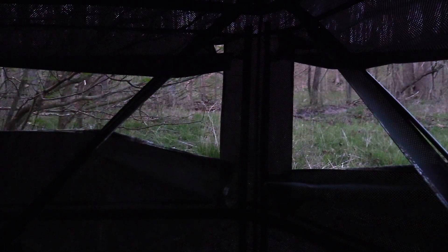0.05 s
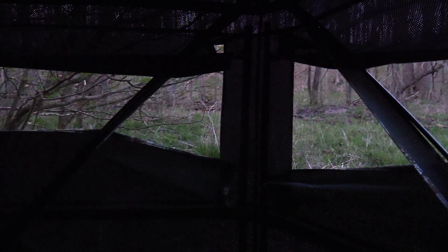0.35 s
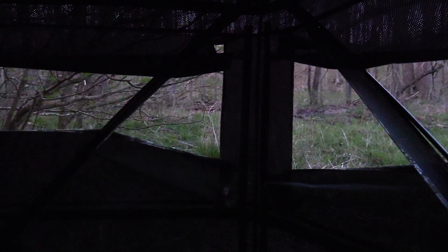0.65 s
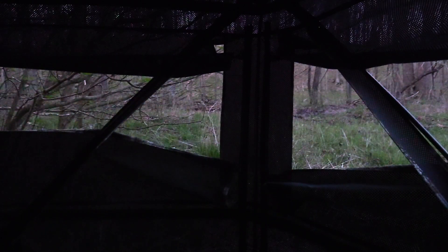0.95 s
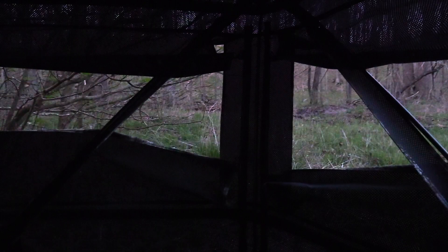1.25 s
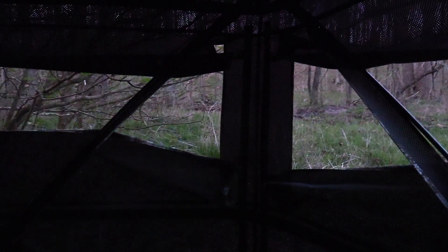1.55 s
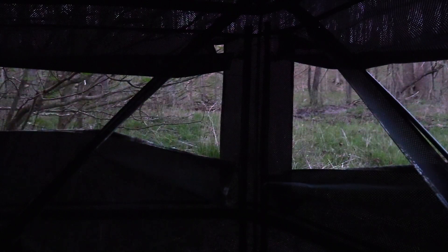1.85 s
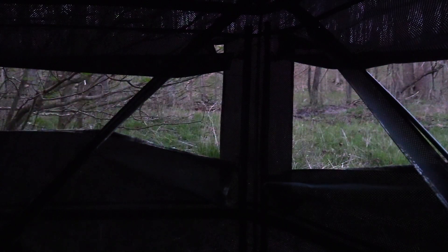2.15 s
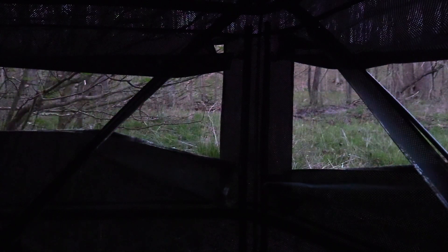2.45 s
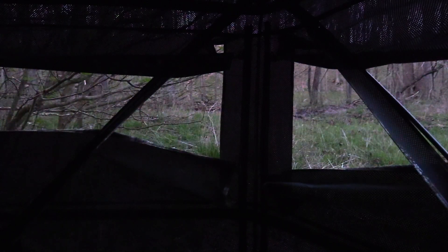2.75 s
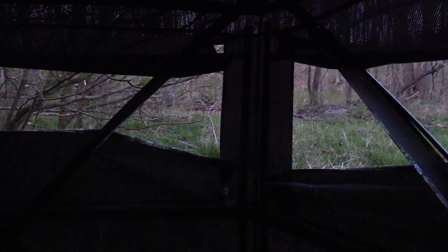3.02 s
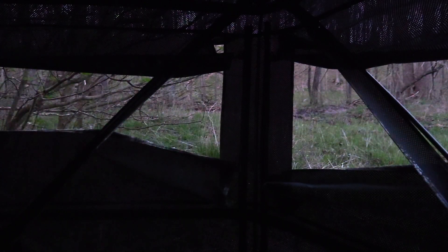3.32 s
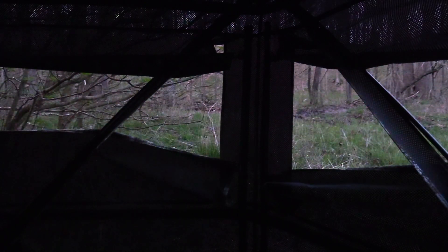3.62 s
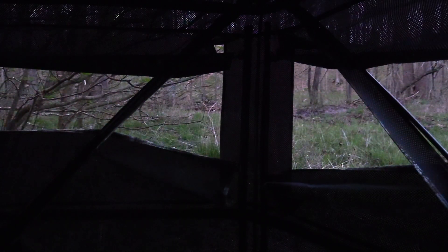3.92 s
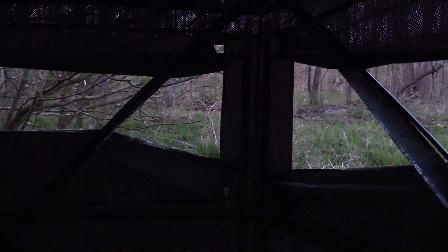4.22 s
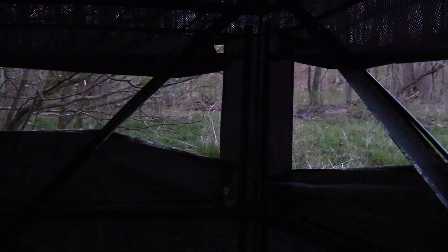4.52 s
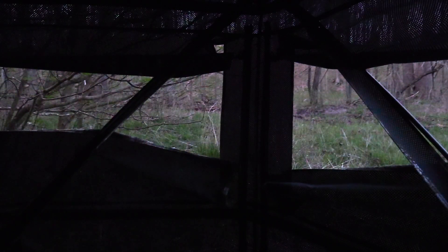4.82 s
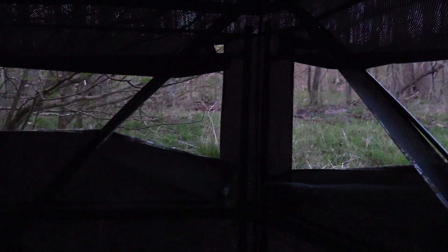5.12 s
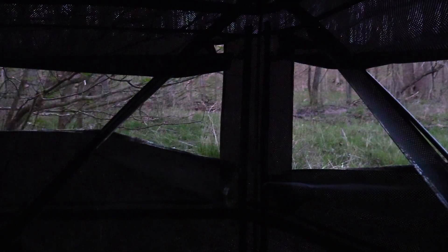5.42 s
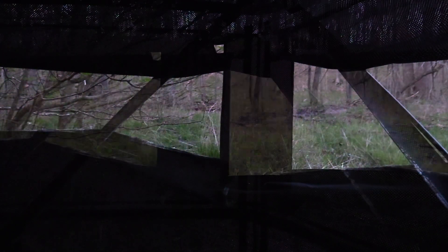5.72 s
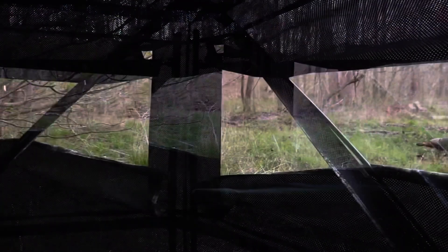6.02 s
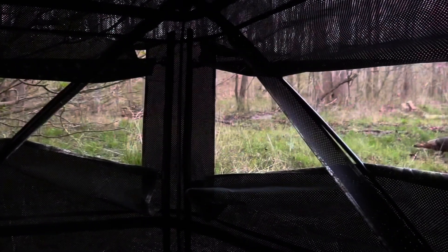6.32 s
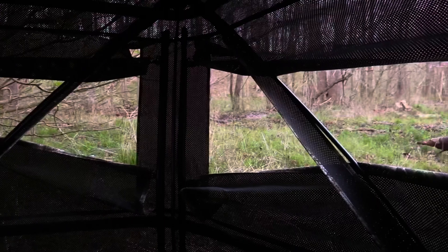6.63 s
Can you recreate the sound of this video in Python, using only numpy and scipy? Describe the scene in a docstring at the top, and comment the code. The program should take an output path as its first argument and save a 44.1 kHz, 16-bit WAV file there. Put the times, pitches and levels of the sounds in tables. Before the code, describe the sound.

Heard from a fabric blind at the edge of a wood, songbirds whistle clear and falling notes over a steady low rumble. A nearby turkey clucks once and yelps five times, sharp and slightly raspy, and a far tom gobbles back. The birdsong carries on alone, thinning out toward the end, when low, muffled thumps knock the microphone.

```python
"""Wild turkey at the blind

From a fabric blind at the edge of a wood: close to the microphone a turkey's vibrating membrane gives
one sharp cluck and five yelps, coloured by throat and beak. A far tom gobbles back, songbirds whistle
among the trees and low air rumbles throughout. Near the end the background fades down and cuts back in,
with the far chorus gone, then soft bumps shake the microphone."""
import sys
import numpy as np
from scipy import signal
from scipy.fft import rfft, irfft, next_fast_len
from scipy.io import wavfile

SR = 44100
rng = np.random.default_rng(int(sys.argv[2]) if len(sys.argv) > 2 else 0)


def bounce(signal):
    """Save signal as a 16-bit WAV file at the path given by the first command-line argument."""
    frames = np.transpose(np.atleast_2d(signal))
    limited = np.clip(frames, -1, 1)
    pcm = np.round(limited * 32767).astype(np.int16)
    wavfile.write(sys.argv[1], SR, pcm)


N = 302967
T = np.arange(N) / SR
SIDE = np.array([[1], [-1]])  # opposite polarity left and right


def undb(db):
    return 10 ** (np.asarray(db) / 20)


def unit(x):
    """Scale to rms 1."""
    return x / np.sqrt(np.mean(x ** 2))


def ramp(t, length):
    """Rise from 0 to 1 over a length of time."""
    return np.clip(t / length, 0, 1)


def curve(rows):
    """Join (t/s, value) points by straight lines."""
    return np.interp(T, *np.transpose(rows))


def span(s, length, fade=0.0073):
    """Sample indices of a note, the time since its start, and a gate with soft ends."""
    i = np.arange(int(s * SR), int((s + length) * SR))
    return i, T[i] - T[i[0]], ramp(np.minimum(i - i[0], i[-1] - i), fade * SR)


def wander(hz):
    """Smooth random motion of rms 1, mostly slower than hz."""
    return unit(signal.sosfilt(signal.butter(2, hz, fs=SR, output="sos"), rng.standard_normal(N)))


def turns(hz):
    """Running phase of a moving frequency."""
    return 2 * np.pi * np.cumsum(hz) / SR


def response(points, hz):
    """Gain of a (f/Hz, level/dB) colour at the given frequencies."""
    f, db = np.transpose(points)
    return undb(np.interp(np.log(hz + 1e-3), np.log(f), db))


def colour(x, points):
    """Filter by a (f/Hz, level/dB) colour."""
    size = next_fast_len(N)
    return irfft(rfft(x, size) * response(points, np.fft.rfftfreq(size, 1 / SR)), size)[:N]


def noise(points):
    """Coloured noise of rms 1."""
    return unit(colour(rng.standard_normal(N), points))


def band(x, hz, width_hz):
    """One resonance, gain 1 at its centre."""
    return signal.lfilter(*signal.iirpeak(hz, hz / width_hz, fs=SR), x)


def narrow_noise(hz, width_hz):
    """Noise passed twice through one resonance, rms 1."""
    return unit(band(band(rng.standard_normal(N), hz, width_hz), hz, width_hz))


def add(out, s, x):
    """Mix a sound in at time s."""
    i = int(s * SR)
    x, i = x[max(-i, 0):], max(i, 0)
    out[i:i + len(x)] += x[:max(N - i, 0)]


def echoes(x, t60, build, dull_hz):
    """Dull, scattered reflections off trunks or fabric that build up and die away."""
    t = T[:2 * SR]
    tail = rng.standard_normal(len(t)) * undb(-60 * t / t60) * (1 - np.exp(-t / build))
    tail = signal.sosfilt(signal.butter(2, dull_hz, fs=SR, output="sos"), tail / np.linalg.norm(tail))
    return signal.fftconvolve(x, tail)[:N]


# low air and the hush of the wood over time: t/s, level/dB
RUMBLE_LEVELS = [(0, -37.5), (4.2, -38), (4.9, -42), (5.9, -41), (6.25, -36)]
HUSH_LEVELS = [(0, -51.5), (3.8, -50), (4.6, -55), (6.87, -55.5)]
# colours of the rumble, the centre of the hush and its stereo sides: f/Hz, relative level/dB
RUMBLE_SPECTRUM = [(15, -6.5), (35, 2), (60, -1), (110, -5), (160, -18.5), (220, -27.5), (500, -54),
                   (1000, -91)]
HUSH_SPECTRUM = [(150, -0.5), (300, 0.5), (500, -0.5), (850, -7), (1400, -4), (2000, -4.5), (3000, -4.5),
                 (4800, -13.5), (7000, -19), (10000, -21.5), (15500, -23.5)]
SIDE_SPECTRUM = [(80, -21), (300, 5), (700, -9.5), (2200, -21), (5000, -7.5), (8000, 2.5), (15500, 0)]
def air(side_db=-15):
    """Low rumble and a soft hush around the blind; mostly the thinnest hiss has stereo width."""
    rumble = noise(RUMBLE_SPECTRUM) * undb(curve(RUMBLE_LEVELS))
    hush = noise(HUSH_SPECTRUM) * undb(0.96 * wander(5.6))
    side = undb(side_db) * noise(SIDE_SPECTRUM) * SIDE
    return rumble + undb(curve(HUSH_LEVELS)) * (hush + side)


# many birds deep in the wood, dying away near the end: t/s, level/dB
CHORUS_LEVELS = [(0, -48.5), (3.4, -47.5), (3.9, -58), (4.9, -50), (5.8, -55), (6.2, -70)]
def chorus(hz=2619, width_hz=220, flicker_db=2):
    """Far song, blended by distance into one wavering band."""
    return narrow_noise(hz, width_hz) * undb(curve(CHORUS_LEVELS) + flicker_db * wander(11))


def background_fade(s=6.11, fade_s=0.39, cut_in_s=0.035, db=-9.5):
    """Gain of the background as it fades down and cuts back in, with the far chorus gone."""
    return undb(curve([(s - fade_s, 0), (s, db), (s + cut_in_s, 0)]))


# hums in the distance: start t/s, end t/s, f/Hz, resonance width/Hz, level/dB
FAR_HUMS = [(-0.27, 2.5, 505, 26, -60), (3.5, 5.2, 1330, 170, -62)]
def far_hums():
    """Faint, narrow bands of noise that swell and fade."""
    out = np.zeros(N)
    for start, end, hz, width_hz, db in FAR_HUMS:
        swell = np.sqrt(np.abs(np.sin(np.pi * ramp(T - start, end - start))))
        out += undb(db) * swell * narrow_noise(hz, width_hz)
    return out


# level whistles around the wood: t/s, length/s, f/Hz, level/dB
WHISTLE_NOTES = [(.25, 0.2, 4740, -57), (.783, 0.13, 6960, -60.5), (2.777, .15, 4810, -55.5),
                 (3.08, 0.35, 3800, -55.5), (4.019, 0.18, 2766, -46.5), (4.039, 0.16, 2470, -48),
                 (4.158, 0.44, 3603, -51.5), (4.84, 0.446, 3497, -51), (5.27, 0.71, 3375, -56.5),
                 (5.367, .2, 6980, -62.5), (6.326, 0.42, 3274, -60), (6.377, 0.299, 2465, -63)]
# one bird's long falling note, repeated: t/s, length/s, level/dB
FALLING_NOTES = [(1.451, .32, -41.5), (1.779, 0.44, -39.5), (2.124, 0.33, -43), (2.918, 0.24, -42),
                 (3.219, .3, -47.5), (4.689, .35, -43.5), (5.039, 0.38, -44)]
# a two-note phrase: t/s, f/Hz, level/dB, all of its long whistle
PHRASE_NOTES = [(-.05, 4200, -44.5), (0.231, 4167, -38), (0.559, 4162, -38), (3.799, 4240, -46),
                (4.133, 4270, -42.5), (4.494, 4260, -39), (4.841, 4215, -39), (5.17, 4207, -39.5)]
# a chip, then a two-voiced hum: t/s, chip level/dB, hum level/dB
CHIP_NOTES = [(0.974, -40, -43), (1.303, -42.5, -43), (5.576, -47.5, -45.5), (5.91, -53, -54.5)]
# quick downward slurs: t/s, top f/Hz, relative level/dB
SLUR_NOTES = [(.33, 2650, -45), (2.712, 2650, -46), (3.059, 2620, -46), (3.44, 2685, -42),
              (3.94, 2315, -52.5), (4.721, 2710, -51), (4.85, 2650, -49.5), (5.21, 2685, -46)]
def song_notes(waver=0.0032, slur_waver=.014, chip_waver=0.0081, sag=.017):
    """The songbirds' notes: t/s, length/s, first f/Hz, last f/Hz, relative level/dB, pitch waver."""
    notes = [(s, length, hz, (1 - sag) * hz, db, waver) for s, length, hz, db in WHISTLE_NOTES]
    notes += [(s, length, 2750, 2632, db, waver) for s, length, db in FALLING_NOTES]
    for s, hz, db in PHRASE_NOTES:
        grace_note = (s - .065, .06, 1.388 * hz, 1.362 * hz, db - 14.5, waver)
        notes += [grace_note, (s, .16, 1.008 * hz, 0.9915 * hz, db, waver / 2)]
    for s, chip_db, hum_db in CHIP_NOTES:
        notes += [(s, .03, 3680, 3540, chip_db, chip_waver),
                  (s + 0.016, .13, 3125, 3085, hum_db, chip_waver),
                  (s + 0.02, .15, 2835, 2790, hum_db, chip_waver)]
    notes += [(s, .11, hz, .82 * hz, db - 1, slur_waver) for s, hz, db in SLUR_NOTES]
    # a thin, high twitter runs on at random
    for when, height in rng.random((120, 2)):
        hz = 5400 + 2900 * height * (1 - 0.53 * when)
        notes.append((3.15 + 2.5 * when, .1, hz, .985 * hz, -72, waver))
    return notes


def songbirds(direct_db=-1, echo_db=-5):
    """Out in the trees, near-pure whistles slide down and linger among the trunks."""
    notes = song_notes()
    out, wobble = np.zeros(N), wander(98)
    for s, length, first_hz, last_hz, db, waver in notes:
        i = np.arange(int(length * SR))
        progress = i / (length * SR)
        glide = last_hz + (first_hz - last_hz) * (1 - progress) ** 2
        hz = glide * (1 + waver * wobble[int(s * SR) + i])
        swell = np.sin(np.pi * progress ** .6)
        add(out, s, undb(db) * np.sqrt(2) * swell * np.sin(turns(hz)))
    return undb(direct_db) * out + undb(echo_db) * echoes(out, t60=0.78, build=0.018, dull_hz=8850)


# knocks on the microphone: t/s, f/Hz, level/dB, rise/s, t60/s
MIC_BUMPS = [(6.14, 26, -30, 0.033, 2.2), (6.245, 68, -15, 0.016, 0.51), (6.594, 66, -10, 0.015, 0.18),
             (6.61, 19.6, -7.5, 0.013, 0.76), (6.681, 67.4, -6, 0.011, 0.25), (6.754, 17.6, -6, 0.015, .3)]
def mic_bumps(tick_s=6.667, tick_db=-43):
    """Soft knocks ring the mount and make it sway; one small tick sounds among them."""
    out, t = np.zeros(N), T[:SR]
    for s, hz, db, rise, t60 in MIC_BUMPS:
        envelope = undb(db - 60 * t / t60) * (1 - np.exp(-(t / rise) ** 2))
        add(out, s, envelope * np.sin(2 * np.pi * hz * t))
    tick = unit(band(band(rng.standard_normal(SR), 3200, 3560), 3200, 4000))
    add(out, tick_s, undb(tick_db - 60 * t / 0.015) * tick)
    return out


# the gobble's two swells: centre t/s, half length/s, added level/dB
GOBBLE_SWELLS = [(2.542, 0.041, 2.5), (2.945, 0.029, 4.5)]
def gobble(start=2.505, length=1.25, rate_hz=19, stumble=.3, swoop=.06, jitter=0.055, depth=0.58):
    """A far tom's rattle of rough, swooping syllables sinks, fades and dulls, blurred by the wood."""
    i, t, gate = span(start, length)
    opening = t < .13  # his first notes are higher, louder and purer
    hz = np.where(opening, 1347, 1088 - 175 * t)
    fade_db = 18.5 * np.maximum(t - 0.43, 0)
    swell_db = sum(db * np.exp(-((T[i] - s) / half) ** 2 / 2) for s, half, db in GOBBLE_SWELLS)
    level_db = -36.5 + 3 * opening - fade_db + swell_db + 2 * wander(11)[i]
    upper_db = 2 - 4 * opening - 9.5 * t
    beat = turns(rate_hz * (1 + stumble * wander(10)[i]))
    phase = turns(hz * (1 + swoop * np.cos(beat) + jitter * wander(230)[i]))
    rasp = noise([(500, -28), (1400, -1), (2100, 8.5), (2700, -0.5), (3500, 6), (4800, -21),
                  (9000, -54)])
    upper = 0.53 * np.sin(1.5 * phase) + 0.25 * np.sin(2.2 * phase) + 0.45 * rasp[i]
    voice = np.sin(phase) + undb(-11) * np.sin(.61 * phase) + undb(upper_db) * upper
    syllables = (1 + depth * np.sin(beat)) ** 2 / 2
    out = np.zeros(N)
    out[i] = voice * gate * undb(level_db) * syllables
    return out + undb(-1.5) * echoes(out, t60=1.0, build=0.0077, dull_hz=4000)


CLUCK_S, ONSET_DB = .724, -16  # the cluck's start; cluck and yelps swell up from ONSET_DB
# throat and beak colour of the cluck: f/Hz, relative level/dB
CLUCK_THROAT = [(300, -35.5), (800, -27.5), (1150, -5), (1400, 3), (1850, -2), (2200, -2.5), (2600, -17),
                (3000, -4.5), (3700, -15.5), (5000, -29.5), (8000, -41.5), (11000, -63), (15000, -69)]
def cluck(open_hz=1154, settled_hz=912, drop_s=.003, attack_s=0.0072, hold_s=0.028, jitter=.13):
    """Close by, the membrane beats chaotically, smearing its partials over the throat resonances."""
    i, t, gate = span(CLUCK_S, 2 * hold_s)
    hz = settled_hz + (open_hz - settled_hz) * np.exp(-np.maximum(T - CLUCK_S, 0) / drop_s)
    release_db = -1150 * np.maximum(t - hold_s, 0)
    db = -9.5 + ONSET_DB * (1 - ramp(t, attack_s)) + release_db
    phase = turns(hz * (1 + jitter * wander(700)))
    membrane = unit(sum(np.sin(k * phase) for k in range(1, 14)))
    voice = colour(membrane + undb(-2) * rng.standard_normal(N), CLUCK_THROAT)
    out = np.zeros(N)
    out[i] = unit(voice[i]) * gate * undb(db)
    return out


# throat and beak colour of the yelps: f/Hz, relative level/dB
YELP_THROAT = [(700, -30), (850, -26.5), (1050, -30), (2300, -21), (2600, -29.5), (3100, -16.5),
               (3450, -21), (4100, -32.5), (4900, -32), (5700, -44.5), (7400, -49.5), (8400, -47),
               (9300, -62), (15000, -64.5)]
# yelps just outside the blind: t/s, length/s, attack/s, lowest f/Hz, reached after/s, closing f/Hz,
# lilt/Hz, lilt after/s, level/dB, relative overtone level/dB, crack level/dB
YELP_NOTES = [(1.226, 0.069, .013, 831, 0.021, 858.6, 8.5, .034, -7.5, -10, -21.5),
              (1.597, 0.066, 0.0052, 811, 0.011, 843, 27.5, .031, -5, -7.5, -16.5),
              (1.929, .077, 0.0073, 789.2, 0.013, 878, 63.5, .048, -5.5, -4, -12.5),
              (2.251, .076, 0.0061, 760, .023, 883.5, 0, .04, -5.5, -4.5, -14),
              (2.591, 0.053, 0.0056, 743, .021, 922.6, 0.5, .03, -5.5, -4, -14.5)]
def yelps(open_hz=972.4, jitter=0.005, shimmer=0.39, release_s=0.024, low_voice_hz=785):
    """Close by, a harmonic voice drops in pitch and climbs again; its second partial carries the note."""
    out, wobble, flutter = np.zeros(N), wander(270), wander(77)
    rasp = noise([(200, -8), (900, -19), (1900, 30.5), (3600, 3.5), (5500, -5.5), (9000, -19),
                  (15000, -25)])
    fray = noise([(1200, -20.5), (2400, 1), (3600, -3), (5200, -22), (9000, -40), (15000, -52)])
    for s, length, attack, low_hz, low_s, close_hz, lilt_hz, lilt_s, db, over_db, _ in YELP_NOTES:
        i, t, gate = span(s, length + .009)  # the voice just outlasts its closing crack
        drop = (open_hz - low_hz) * (1 - ramp(t, low_s)) ** 3.2
        climb = (close_hz - low_hz) * (np.maximum(t - low_s, 0) / (length - low_s)) ** 1.25
        lilt = lilt_hz * np.exp(-((t - lilt_s) / .008) ** 2)
        hz = low_hz + drop + climb + lilt
        release_db = -9.5 * np.maximum(1 + (t - length) / release_s, 0) ** 2
        effort_db = ONSET_DB * (1 - ramp(t, attack)) + release_db
        phase = turns(hz * (1 + jitter * wobble[i]))
        pulse = 1 + np.cos(phase)  # fray and rasp pulse with the membrane
        # the partials' phases are spread to soften the peaks, and each flutters on its own
        partials = [response(YELP_THROAT, k * hz) * np.sin(k * phase + k * k)
                    * (1 + shimmer * flutter[i + k * len(i)]) for k in range(1, 18)]
        # at the bottom of the range the main tone gives way to the middle partials
        low_voice = (1 + np.tanh((low_voice_hz - hz) / 7)) / 2
        main = undb(-5 * low_voice) * (partials[0] + np.sin(2 * phase))
        middle = sum(partials[2:6]) + undb(-30) * fray[i] * pulse
        # the middle partials outlast the main tone; the top ones sound only at its loudest
        middle *= undb(over_db + 9 * low_voice - 0.76 * effort_db)
        top = undb(-1 + .6 * effort_db) * sum(partials[6:])
        # the rasp is strongest until the note has settled
        opening = np.exp(-np.maximum(t - attack, 0) / 0.004)
        roughness = (undb(-33) + undb(-20) * opening) * rasp[i] * pulse
        out[i] += gate * undb(db + effort_db) * (np.sqrt(2) * (main + middle + top) + roughness)
    # a narrow antiresonance dents the second partial as it passes through
    return out - .65 * band(out, hz=1765, width_hz=60)


def cracks(upper_hz=1856, jitter=0.038, rise_share=0.81):
    """Two unrelated tones flare up for an instant where the near bird's membrane starts or stops."""
    out, low_wobble, high_wobble = np.zeros(N), wander(220), wander(400)
    # one opens the cluck, two frame each yelp: t/s, half length/s, lower f/Hz, level/dB, upper gain/dB
    flares = [(CLUCK_S + .0062, .0036, 1193, -6.5, -9)]
    for s, length, *_, db in YELP_NOTES:
        flares += [(s + after, 0.0029, 1071, db, 5) for after in (0.0032, length)]
    for s, half, lower_hz, db, upper_db in flares:
        i = int(s * SR) + np.arange(-SR // 50, SR // 50)
        lower = np.sin(turns(lower_hz * (1 + jitter * low_wobble[i])))
        upper = undb(upper_db) * np.sin(turns(upper_hz * (1 + jitter * high_wobble[i])))
        width = half * np.where(T[i] < s, rise_share, 1)
        flare = np.exp(-((T[i] - s) / width) ** 2 / 2)
        out[i] += np.sqrt(2) * undb(db) * (lower + upper) * flare
    return out


def scene():
    """At the microphone: the near turkey, its echoes off the blind and the trees, and the wood beyond."""
    near_cluck = cluck()
    turkey = yelps() + cracks() + near_cluck
    blind = undb(-13.5) * echoes(turkey, t60=0.079, build=0.0076, dull_hz=7000)
    blind_sides = undb(-47.5) * echoes(turkey, t60=.05, build=.002, dull_hz=9000) * SIDE
    trees = undb(-30.5) * echoes(turkey, t60=1.3, build=.03, dull_hz=5000)
    trees += undb(-14.5) * echoes(near_cluck, t60=0.85, build=0.017, dull_hz=2200)
    distance = gobble() + songbirds() + far_hums()
    bumps = mic_bumps()
    background = background_fade() * (chorus() + air())
    return turkey + blind + blind_sides + trees + distance + bumps + background


def record(dry, top_hz=15900):
    """The recorder rounds the very highest peaks and cuts the top."""
    rounded = dry / (1 + dry ** 12) ** (1 / 12)
    return signal.sosfilt(signal.ellip(10, .2, 70, top_hz, fs=SR, output="sos"), rounded)


dry = scene()
out = record(dry)
bounce(out)
```